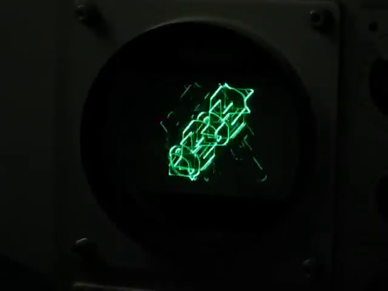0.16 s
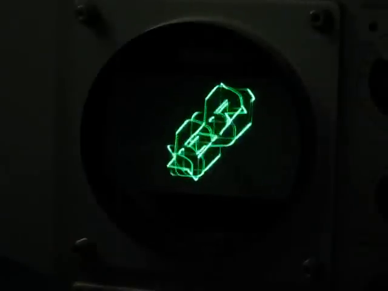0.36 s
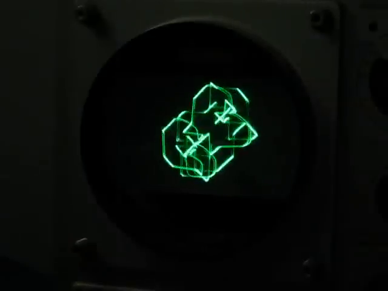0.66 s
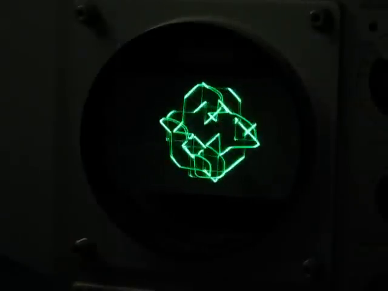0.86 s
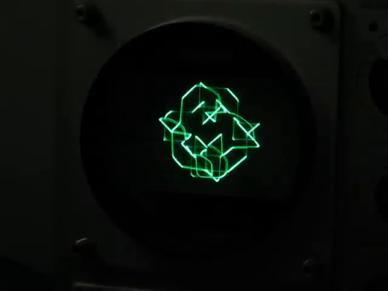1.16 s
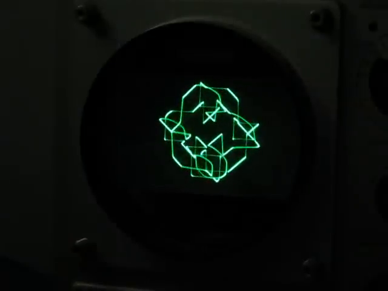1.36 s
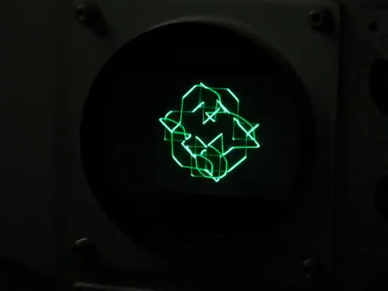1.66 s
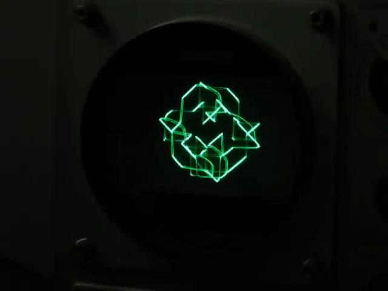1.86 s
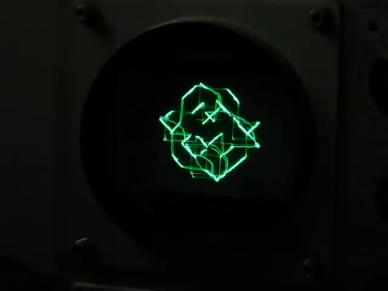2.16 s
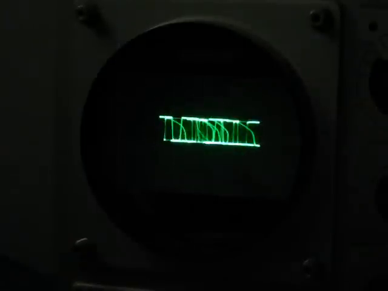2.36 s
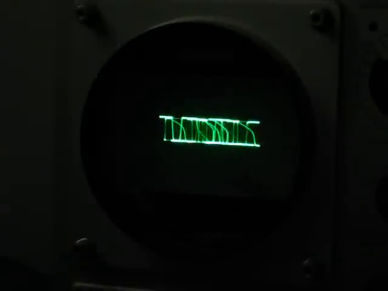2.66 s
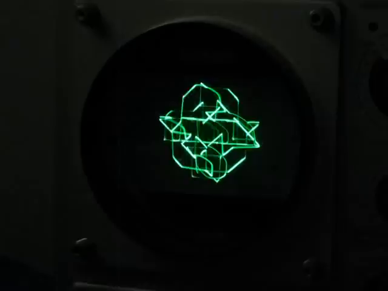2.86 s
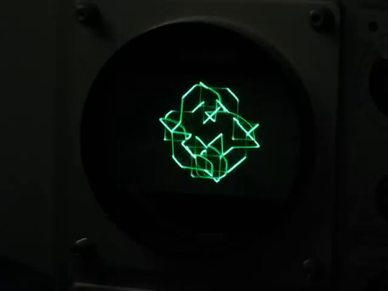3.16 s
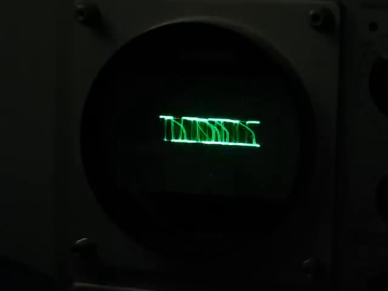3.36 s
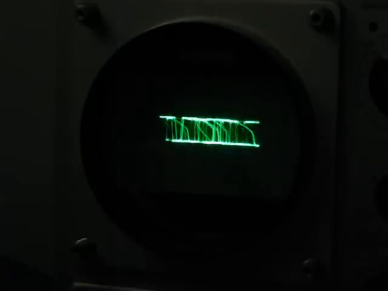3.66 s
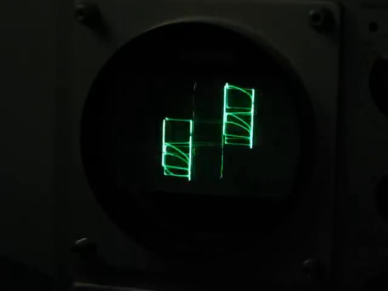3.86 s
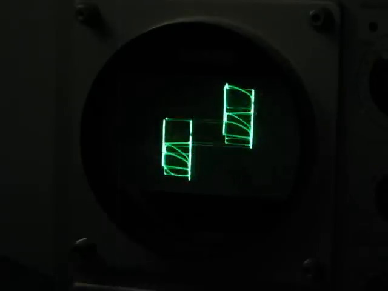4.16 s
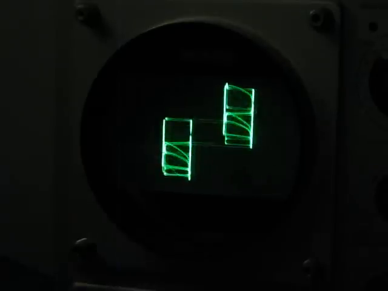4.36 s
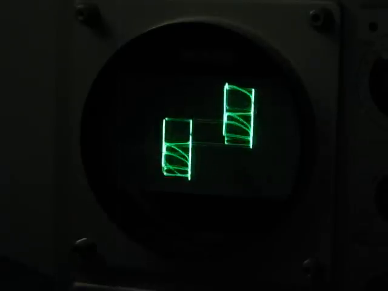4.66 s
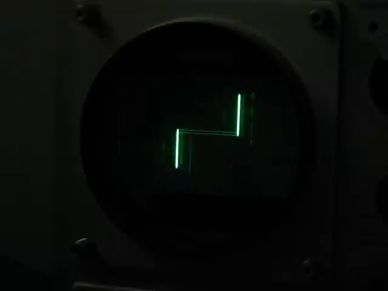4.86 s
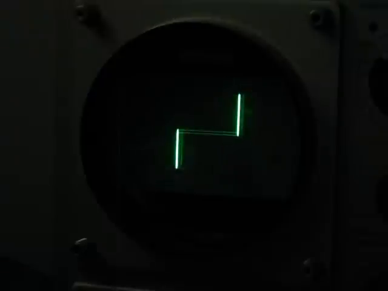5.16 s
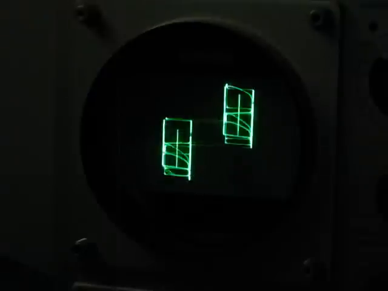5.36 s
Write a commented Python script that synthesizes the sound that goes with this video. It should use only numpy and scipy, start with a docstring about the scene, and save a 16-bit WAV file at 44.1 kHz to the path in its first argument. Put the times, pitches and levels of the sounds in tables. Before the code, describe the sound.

Constant mid-low fan noise and unsteady motor hum lie under scattered button presses. After about a second of hum alone come light taps and a finger rub, then loud bright snaps with short rattles and dull thuds, densest between two and a half and four seconds, then a pause and two later presses. Close mono microphone with gain control in a small quiet room.

```python
"""Fingers press buttons and keys close by: contacts snap brightly as short noise bursts through resonances.
Some presses also knock the case, whose decaying sine modes ring over a dull thud, and skin rubs on the panel.
Behind them a bench instrument runs in a quiet room: shaped noise is the rush of its cooling fan,
and unsteady sine tones are the hum of its motor and transformer.
A small microphone with gain control listens, its treble limited and its loudest peaks rounded."""
import sys
import numpy as np
from scipy import signal
from scipy.fft import rfft, irfft, next_fast_len
from scipy.io import wavfile
from scipy.ndimage import uniform_filter1d, minimum_filter1d, map_coordinates

SR = 44100
rng = np.random.default_rng(int(sys.argv[2]) if len(sys.argv) > 2 else 0)


def file_out(sig):
    """Save sig as 16-bit WAV at sys.argv[1]."""
    # one column per channel
    cols = np.atleast_2d(sig).T
    # limit, then scale
    lim = np.clip(cols, -1, 1)
    pcm = np.round(lim * 32767).astype(np.int16)
    wavfile.write(sys.argv[1], SR, pcm)


N = 243873


def amp(db):
    """Decibel law: level in dB to amplitude ratio."""
    return 10 ** (np.asarray(db) / 20)


def unit(x):
    """Normalisation to a root-mean-square value of one."""
    return x / np.sqrt(np.mean(x ** 2) + 1e-20)


def wobble(rate):
    """Band-limited random drift: a smooth curve through rate random knots a second."""
    knots = rng.standard_normal(int(N * rate / SR) + 4)
    return map_coordinates(knots, [np.arange(N) * rate / SR])


def filtered(x, response):
    """Linear filtering: the spectrum of x times a response of frequency."""
    m = next_fast_len(len(x) + 8192)  # zero padding leaves room for the filter's ringing
    return irfft(rfft(x, m) * response(np.fft.rfftfreq(m, 1 / SR)), m)[:len(x)]


def resonances(modes, f, scatter_db):
    """Modal superposition: causal second-order resonances of alternating sign, each at a new strength."""
    gains = amp(scatter_db * rng.standard_normal(len(modes)))
    total = 0
    for k, (centre, width, db) in enumerate(modes):
        damping = 1j * f * width
        total = total + (-1) ** k * gains[k] * amp(db) * damping / (centre ** 2 - f ** 2 + damping)
    return total


def add(track, s, sound):
    """Linear superposition: mix a sound into the track at s seconds."""
    part = track[round(s * SR):][:len(sound)]
    part += sound[:len(part)]


# spectrum of the fan's air rush: f/Hz, relative spectral level/dB
AIR_SPECTRUM = [(25, -30), (60, -26), (110, -21.5), (200, -15.5), (300, -12), (390, -14), (520, -7.5),
                (630, -10), (700, -8), (900, -13), (1500, -18.5), (2700, -20), (4500, -30), (7000, -40),
                (10300, -44)]
# resonances of the air path through the case: f/Hz, width/Hz, lift/dB
DUCT_RESONANCES = [(760, 30, 1), (1202, 31, 4), (1310, 50, 2.5), (1407, 27, 4), (1640, 44, 4),
                   (1840, 60, 4), (2123, 49, 4), (2745, 55, 4), (3330, 100, 2.5), (4050, 130, 0.5)]
AIR_DB = -37  # rms level of the rush


def fan():
    """Turbulence noise: broadband, slightly patchy in time and frequency, coloured by duct resonance."""
    z = signal.stft(rng.standard_normal(N), nperseg=512)[2]
    field = uniform_filter1d(rng.standard_normal(z.shape), 6, axis=0)
    field = uniform_filter1d(field, 12, axis=1)
    patchy_db = 20 * np.log10(amp(0.67 * unit(field)))
    noise = signal.istft(z * amp(patchy_db), nperseg=512)[1][:N]
    hz, db = np.transpose(AIR_SPECTRUM)

    def response(f):
        lift_db = sum(gain_db / (1 + (2 * (f - c) / w) ** 2) for c, w, gain_db in DUCT_RESONANCES)
        return amp(np.interp(np.log(f + 1), np.log(hz), db) + lift_db)

    return amp(AIR_DB) * unit(filtered(noise, response))


# tones of motor and transformer: f/Hz, rms level before drift/dB, unsteadiness (0 to 1)
HUM_TONES = [(119.8, -57.5, 0.48), (236.1, -47.5, 0.16), (359.8, -60, 1), (425.8, -46, 0.31),
             (519.4, -47.5, 0.7), (545.2, -47.5, 0.5), (568.7, -50.5, 0.86), (670, -49, 0.58),
             (685.5, -50, 0.97), (722, -48.5, 0.46), (928, -55.5, 0.86), (1107, -57.5, 0.58)]


def hum():
    """Narrow-band modulation: each sine tone drifts in level and phase on its own."""
    t = np.arange(N) / SR
    total = np.zeros(N)
    for hz, db, loose in HUM_TONES:
        level = np.sqrt(2) * amp(db + 5.05 * loose * wobble(14))
        phase = 2.04 * loose * wobble(9) + rng.uniform(0, 2 * np.pi)
        total += level * np.sin(2 * np.pi * hz * t + phase)
    return total


# knocks on the case: t/s, drive level/dB, pitch struck most f/Hz
CASE_KNOCKS = [(1.177, -20.5, 655), (1.2, -18.5, 665), (2.295, -26, 1170), (2.558, -12.5, 730),
               (2.563, -34.5, 78), (2.571, -16, 576), (2.572, -25.5, 312), (3.096, -11, 813),
               (3.099, -33, 78), (3.364, -12.5, 870), (3.369, -36, 78), (3.378, -15, 606),
               (3.826, -8.5, 813), (3.869, -33, 1200), (4.905, -17, 650), (5.399, -28.5, 1200)]
# modes of the case: f/Hz, relative level/dB, t60/s
CASE_MODES = [(78, -5, 0.24), (312, 5.5, 0.072), (438, -3.5, 0.1), (576, -10, 0.12), (665, -12, 0.17),
              (813, -0.5, 0.052), (937, -6.5, 0.077), (1086, -12, 0.09), (1298, -4, 0.1),
              (2150, -1.5, 0.11)]
THUD_DB, THUD_T60_S = -12.5, 0.17  # thud relative to the knock's drive level


def case():
    """Modal excitation: a soft blow rings modes near its pitch; countless weaker ones blur into a thud."""
    track, t = np.zeros(N), np.arange(SR // 2) / SR
    hz, level_db, t60 = np.transpose(CASE_MODES)[:, :, None]
    for s, db, pitch_hz in CASE_KNOCKS:
        octaves = np.abs(np.log2(hz / pitch_hz))
        near_db = -30 * np.tanh(octaves / 1.15) + rng.normal(0, 1.9, hz.shape)
        phase = 2 * np.pi * (hz * t + rng.random(hz.shape))
        ring = amp(level_db + near_db - 60 * t / t60) * np.sin(phase)
        bands = [(pitch_hz, 1.3 * pitch_hz, 0), (2300, 1500, -8)]
        # the last factor thins the lows under 250 Hz
        blur = filtered(rng.standard_normal(len(t)),
                        lambda f: resonances(bands, f, scatter_db=2) * f / (f + 250))
        thud = amp(THUD_DB - 60 * t / THUD_T60_S) * unit(blur)
        onset = 1 - np.exp(-t / 0.0016)
        add(track, s, amp(db) * onset * (ring.sum(axis=0) + thud))
    return track


# button contacts: t/s, drive level/dB, pitch f/Hz, low part's gain/dB, rattle level re crack/dB
CONTACTS = [(1.187, -27, 5000, -6, -9), (1.197, -27.5, 5500, 6, -3), (1.219, -22, 6500, -13, -18),
            (1.261, -24, 6450, -4, -17), (1.495, -17, 6360, -15, -13), (1.529, -31.5, 7000, -14, -1),
            (2.089, -27.5, 7400, -12, -17), (2.283, -36, 5000, -11, -4), (2.29, -17, 7100, -7, -15),
            (2.556, -7.5, 6900, -8, -31), (2.5575, 1, 6580, -4, -9), (2.8429, -7, 5900, -29, -12.5),
            (2.895, -28, 5600, -13, -10), (3.004, -31, 7500, -11, -17), (3.0831, -2.5, 7600, -19, -10),
            (3.0855, 3, 6500, -19, -16.5), (3.0869, 4.5, 5400, -7, -13), (3.2865, -12.5, 5600, -9, -12.5),
            (3.302, -20, 5600, -28, -22), (3.352, -21, 6500, -6, -7), (3.364, 0.5, 5850, -4.5, -10),
            (3.7141, -18, 6200, -12, -19), (3.7205, -13.5, 6850, -3.5, -11), (3.7725, -22, 7000, -19, -32),
            (3.809, -12, 6500, -7, -36), (3.8114, -3.5, 5500, -3.5, -12), (3.8117, 8.5, 6480, -16, -10.5),
            (3.8202, -5, 4600, -20, -13), (3.828, -5, 7550, -2, -21), (3.8559, 2.5, 4800, -8, -8.5),
            (4.0325, -31, 6000, -12, -22), (4.074, -30.5, 5200, -16, -24), (4.175, -27.5, 6350, -15, -15),
            (4.7856, -21.5, 5500, 4.5, -11.5), (4.8968, 1, 6560, -23, -19), (4.9056, -3, 6170, -10.5, -14),
            (5.119, -32, 6450, -10, -3.5), (5.34, -17, 7000, -11, -13), (5.367, -15, 5350, -25, -11),
            (5.374, -17.5, 5500, -15, -12), (5.3971, -5.5, 6600, -8.5, -16), (5.404, -15, 6200, -8, -14)]
# what a contact rings with: f/Hz, width/Hz, level/dB
BUTTON_MODES = [(4070, 580, 0.5), (4600, 270, 5), (5000, 270, 2), (5500, 410, 1.5), (6200, 750, -0.5),
                (7250, 770, -3.5), (9030, 710, -2.5), (10580, 720, -2.5)]
# what the finger's weight adds below it: f/Hz, width/Hz, level/dB
WEIGHT_MODES = [(650, 880, -1), (1220, 490, 3.5), (2240, 480, -4.5), (2706, 166, 1), (3490, 510, 0.5)]
SNAP_T60_S = 0.01
RATTLE_T60_S, LONGER_S_PER_DB = 0.2, 0.0042  # at 0 dB drive; harder presses rattle longer


def buttons():
    """Impulse excitation: tick and crack, then loose parts and near walls keep a fainter, duller rattle."""
    track, t = np.zeros(N), np.arange(SR // 2) / SR
    for s, db, pitch_hz, weight_db, rattle_db in CONTACTS:
        tick = 4.2 * (t == 0)
        crack = amp(-60 * t / SNAP_T60_S) * rng.standard_normal(len(t)) + tick
        rattle_t60 = max(RATTLE_T60_S + LONGER_S_PER_DB * db, 0.05)
        rattle = amp(rattle_db - 60 * t / rattle_t60) * rng.standard_normal(len(t))
        rattle = filtered(rattle, lambda f: 1 / (1 + 1j * f / 6500))
        # each contact favours the resonances near its own pitch
        modes = []
        for hz, width, level_db in BUTTON_MODES:
            most_db = 7.5 if hz > pitch_hz else np.inf  # limits the loss above the pitch only
            loss_db = min(21 * abs(np.log2(hz / pitch_hz)), most_db)
            modes.append((hz, width, level_db - loss_db))

        def colour(f):
            bright = resonances(modes, f, scatter_db=2.0)
            return bright + amp(weight_db) * resonances(WEIGHT_MODES, f, scatter_db=0.5)

        add(track, s, amp(db) * filtered(crack + rattle, colour))
    return track


# fingers sliding over the panel: start t/s, length/s, level/dB, pitch f/Hz
PANEL_RUBS = [(1.19, 0.039, -43, 2310), (1.203, 0.16, -40.5, 660), (1.346, 0.12, -56, 6500),
              (2.428, .04, -54, 6500), (3.851, 0.014, -22, 5500), (3.881, 0.11, -36.5, 4600),
              (5.115, 0.046, -54, 6500)]


def fingers():
    """Sliding friction: grainy noise through one broad resonance, under a smooth stroke."""
    track = np.zeros(N)
    for s, length, db, pitch_hz in PANEL_RUBS:
        count = round(length * SR)
        # random sample-by-sample strength makes the noise grainy
        grains = rng.standard_normal(SR // 4) * amp(1.9 * rng.standard_normal(SR // 4))
        band = [(pitch_hz, 0.7 * pitch_hz, 0)]
        rub = unit(filtered(grains, lambda f: resonances(band, f, scatter_db=0)))
        stroke = np.hanning(count) ** 0.55
        add(track, s, amp(db) * stroke * rub[:count])
    return track


def scene():
    """Superposition of all sources in one channel."""
    return (fan() + hum() + case() + buttons() + fingers())[None]


NOTCH_HZ, EDGE_HZ, TOP_HZ = 7880, 10340, 11160


def record(dry):
    """Gain control and band limiting: loud presses duck the level; the port has a notch and a band edge."""
    x = dry[0]
    # the loudest moment of the last 0.122 s holds the gain down, 7.9 ms late
    hold, delay = round(0.122 * SR), round(0.0079 * SR)
    power = np.abs(uniform_filter1d(x ** 2, round(0.0089 * SR)))
    loud_db = 10 * np.log10(power + 1e-12)
    cut_db = -0.9 * np.maximum(loud_db + 14.0, 0)  # acts above -14 dB
    gain_db = minimum_filter1d(np.pad(cut_db, (hold // 2 + delay, 0)), hold)[:N]
    x = x * amp(uniform_filter1d(gain_db, round(0.014 * SR)))

    def port(f):
        notch = (np.abs(f - NOTCH_HZ) + 8) / np.hypot(f - NOTCH_HZ, 400)
        edge = np.maximum(1 / np.sqrt(1 + (f / EDGE_HZ) ** 600), amp(-38))  # steep, down to a floor
        return notch * edge

    x = filtered(x, port)
    x = x / (1 + np.abs(x / 0.93) ** 8) ** (1 / 8)  # rounds peaks off towards 0.93
    return filtered(x, lambda f: f < TOP_HZ)[None]


dry = scene()
out = record(dry)
file_out(out)
```